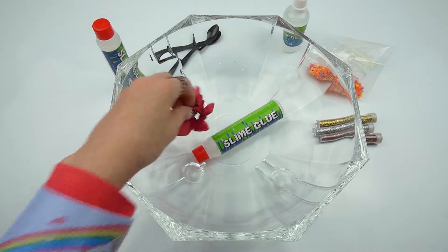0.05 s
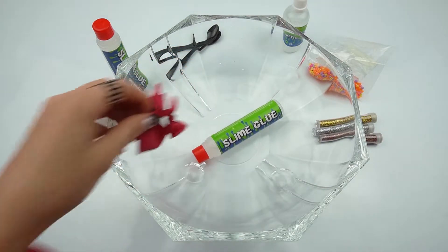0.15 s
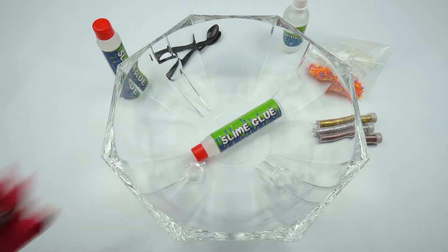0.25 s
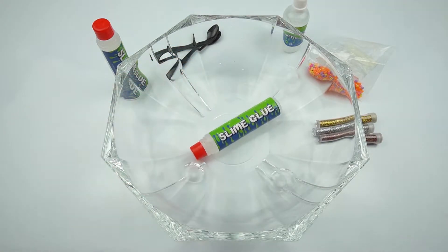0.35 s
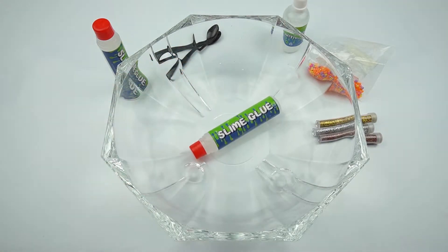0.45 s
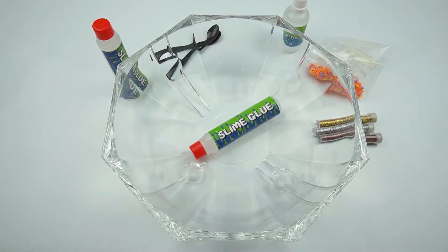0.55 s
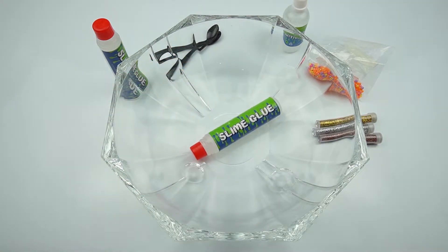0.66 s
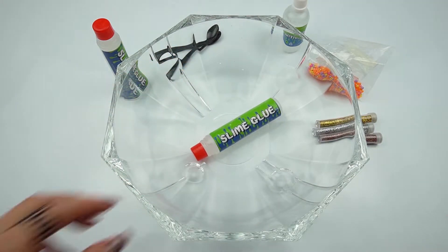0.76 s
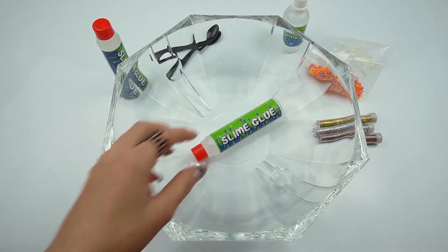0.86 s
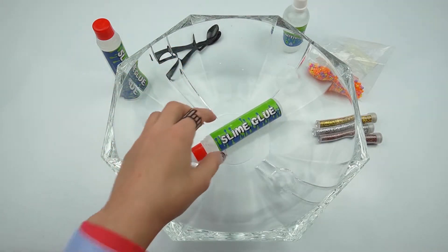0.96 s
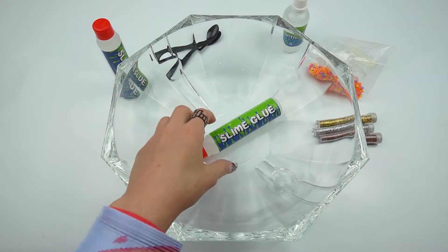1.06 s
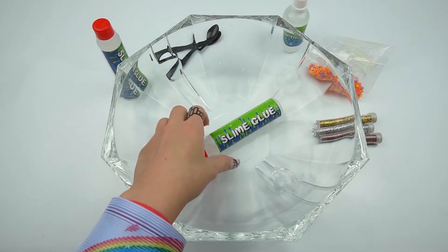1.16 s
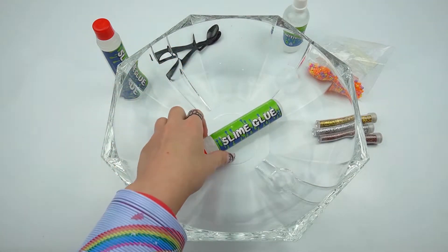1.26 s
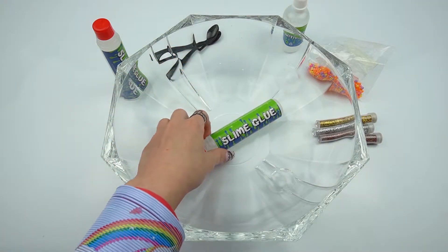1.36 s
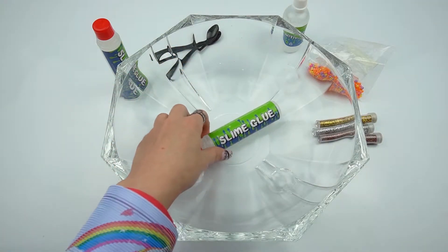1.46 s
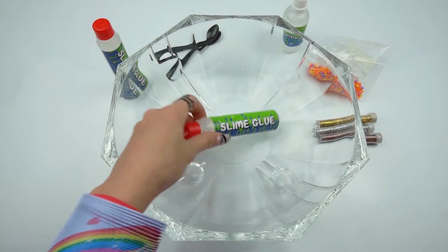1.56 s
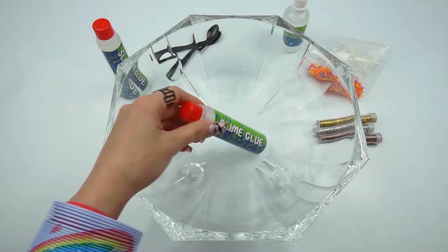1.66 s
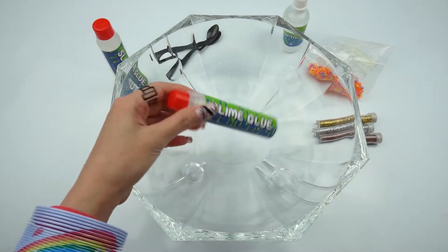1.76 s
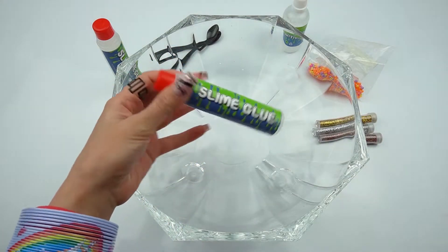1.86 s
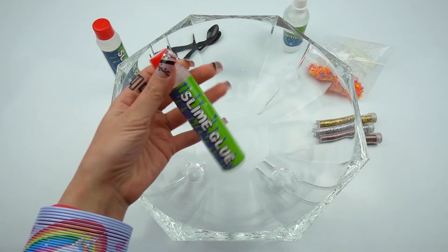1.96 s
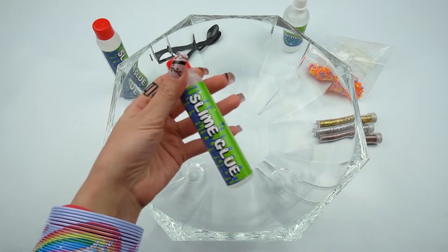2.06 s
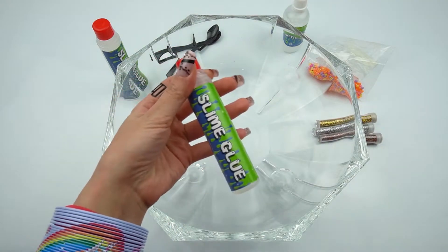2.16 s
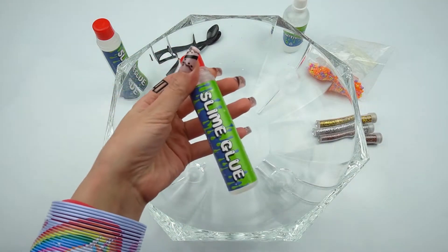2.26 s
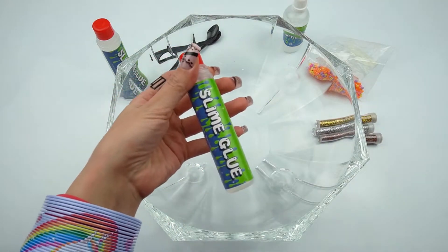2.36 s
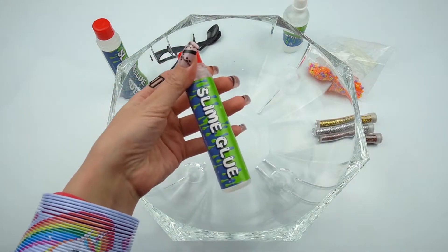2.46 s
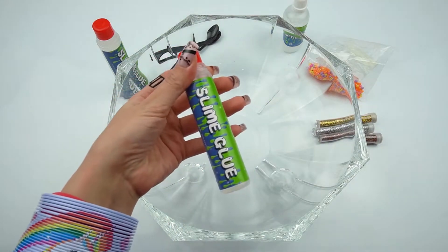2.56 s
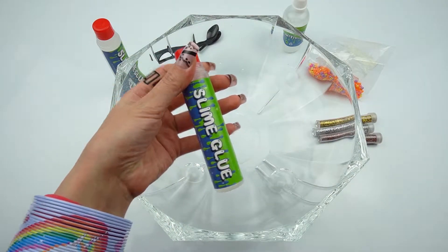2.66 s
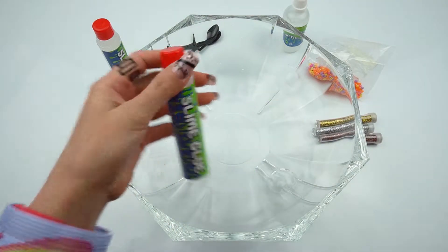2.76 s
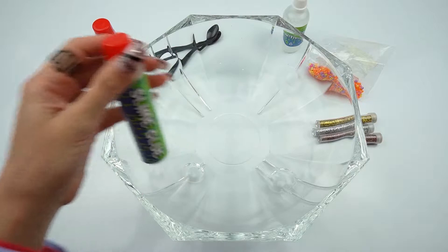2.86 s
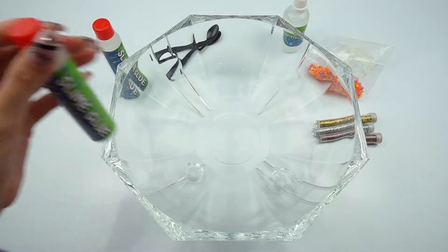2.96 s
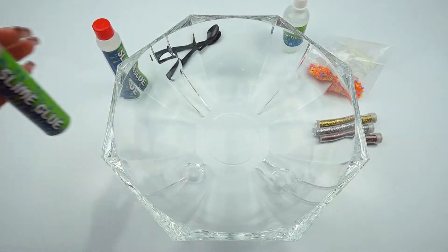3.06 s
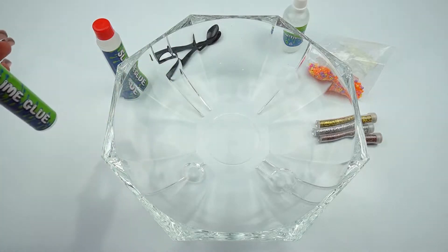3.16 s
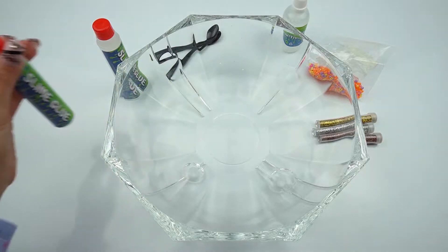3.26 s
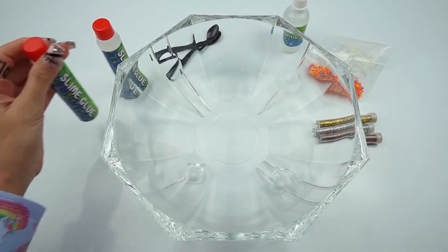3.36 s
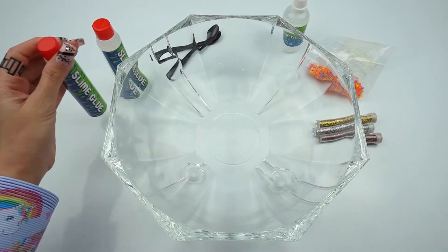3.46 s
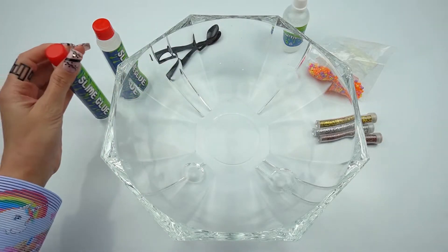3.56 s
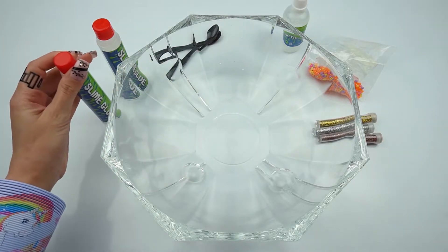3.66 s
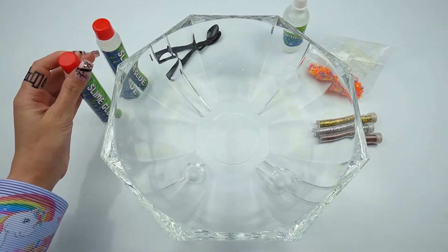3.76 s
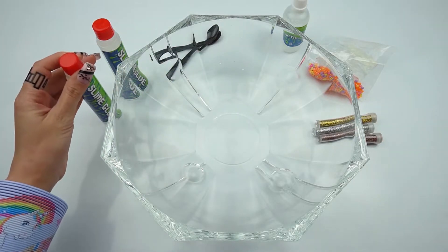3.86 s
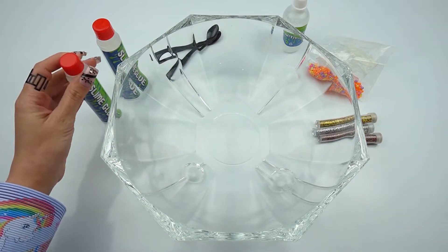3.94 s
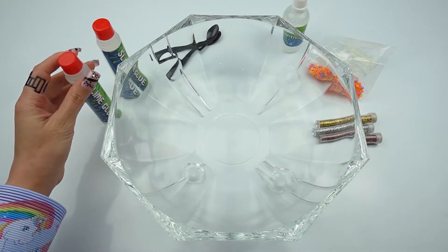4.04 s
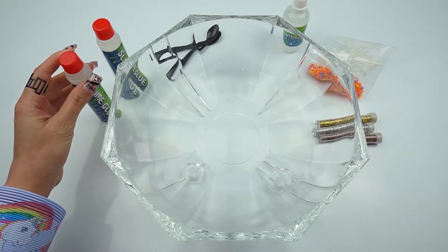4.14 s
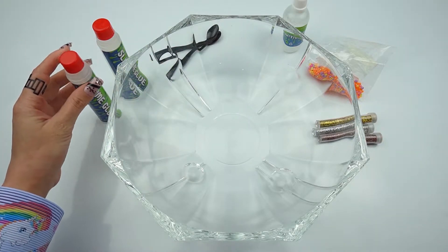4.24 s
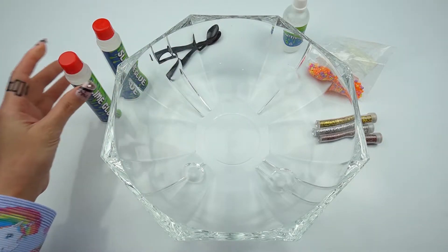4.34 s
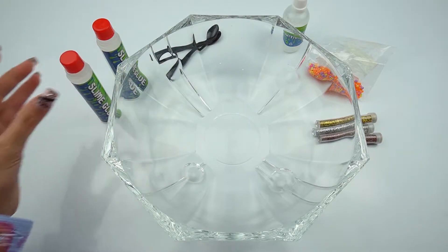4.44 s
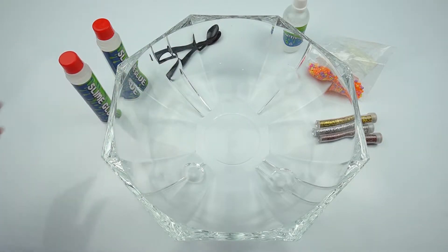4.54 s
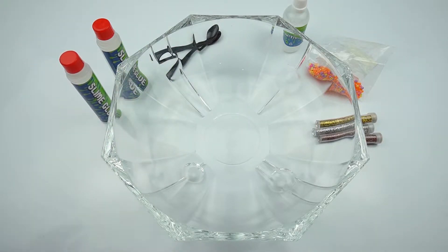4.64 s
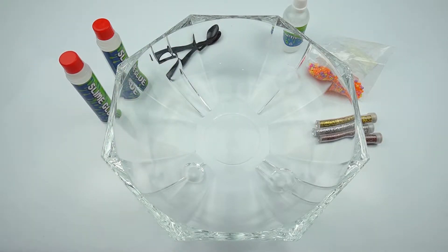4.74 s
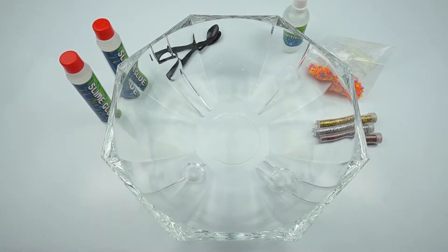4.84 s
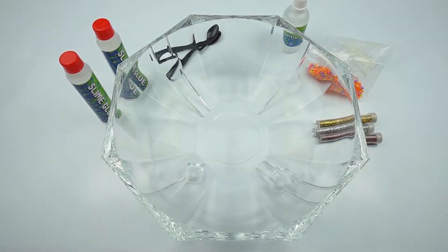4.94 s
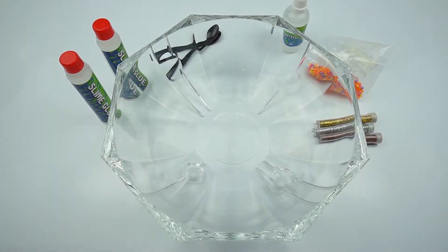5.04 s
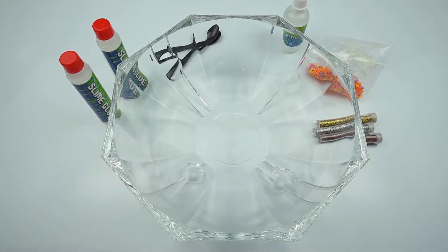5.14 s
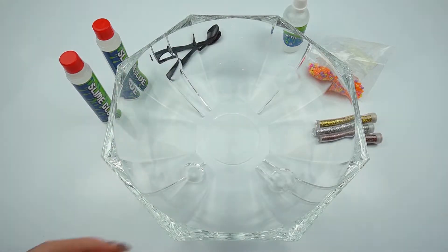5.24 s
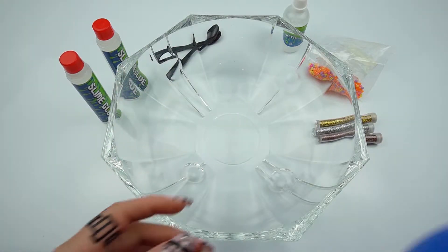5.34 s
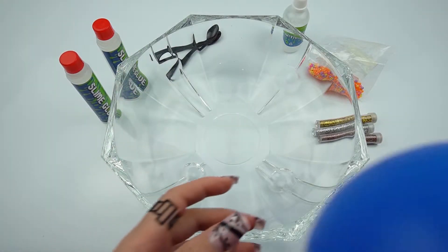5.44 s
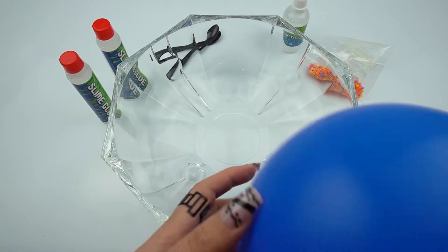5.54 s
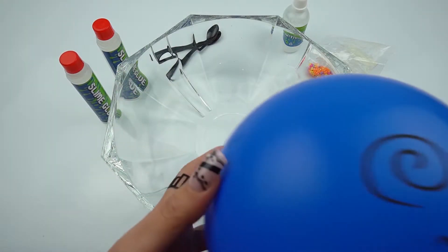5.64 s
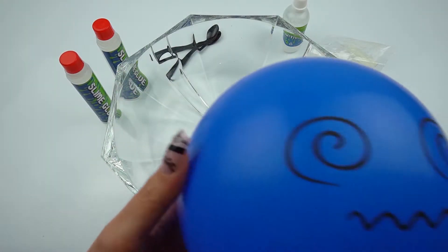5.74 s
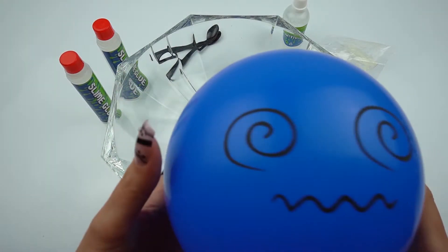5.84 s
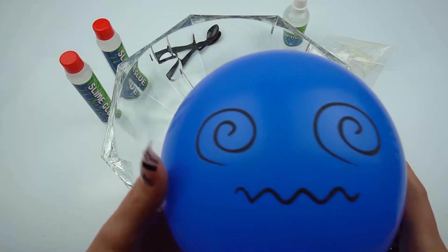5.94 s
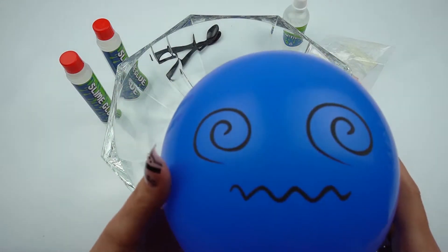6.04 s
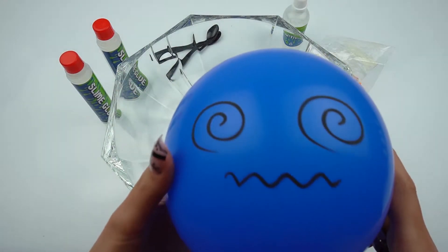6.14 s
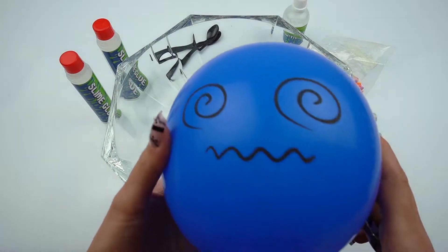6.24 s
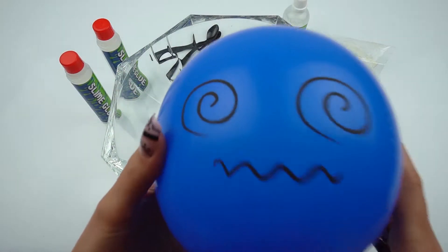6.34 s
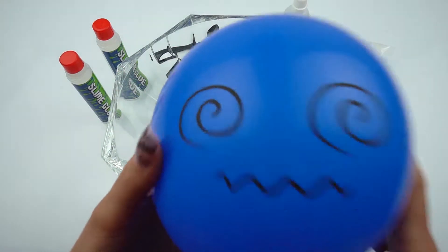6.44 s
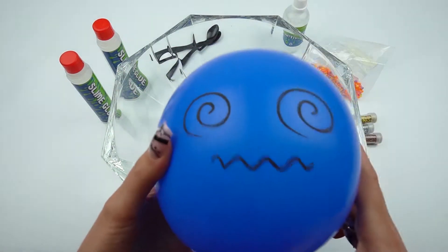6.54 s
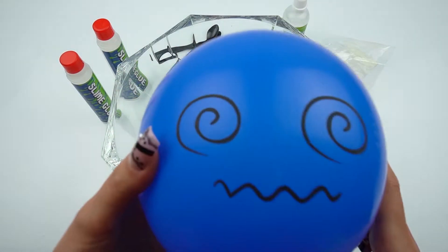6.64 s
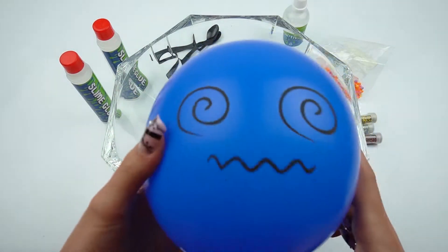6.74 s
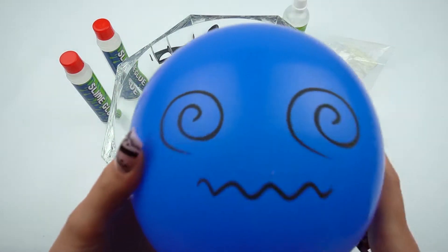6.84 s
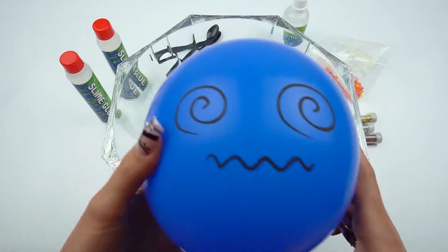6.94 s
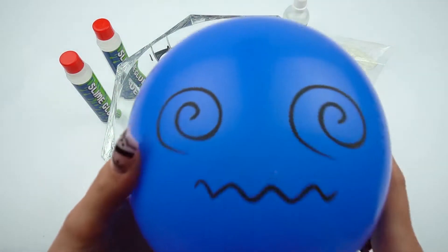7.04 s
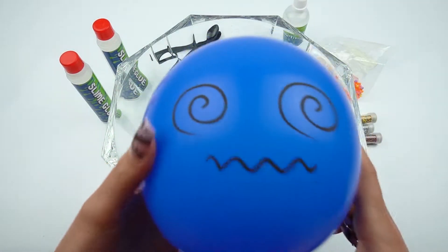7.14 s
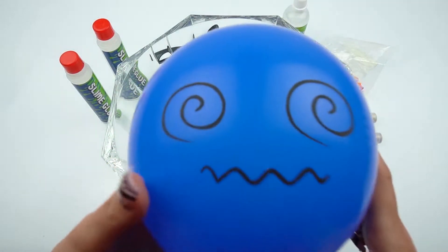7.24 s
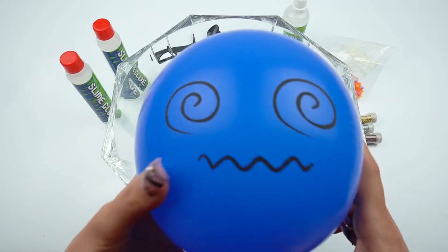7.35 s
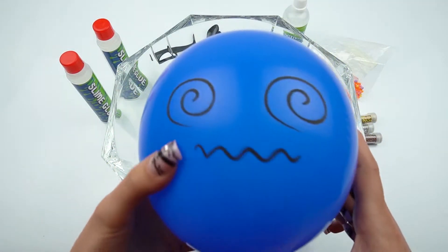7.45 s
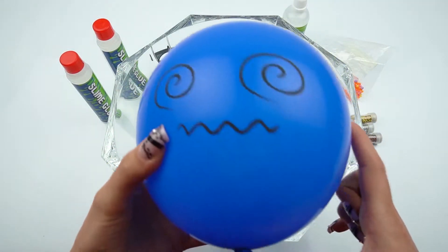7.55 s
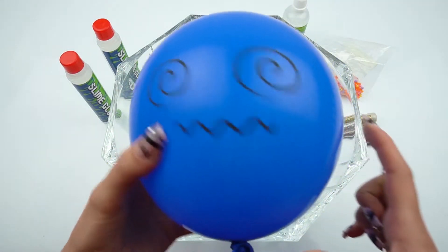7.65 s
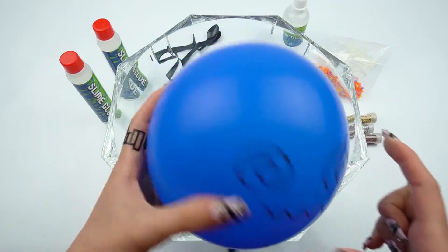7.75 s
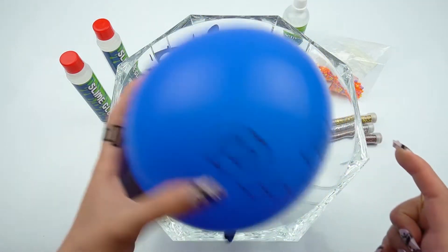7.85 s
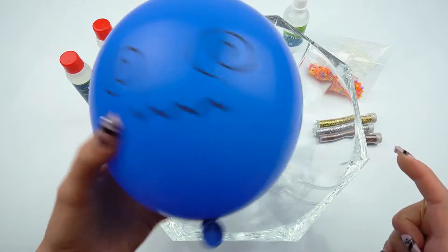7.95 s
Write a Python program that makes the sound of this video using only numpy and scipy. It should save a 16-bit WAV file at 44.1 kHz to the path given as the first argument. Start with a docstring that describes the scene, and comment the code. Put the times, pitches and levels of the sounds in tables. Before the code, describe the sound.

In a quiet small room, a hand shuffles softly, then nails and ring tick and clink brightly on a glass bowl as a plastic bottle is lifted. It lands on the table with a dull hollow knock. After a near-silent gap, an inflated balloon is handled right at the microphone: deep thumping pats, wobbling bass, hollow air ringing, sharp skin slaps and dry rubbery hiss, the loudest hits overloading.

```python
"""Bottle from a glass bowl, then a balloon

A hand lifts a plastic bottle out of a glass bowl, ring and nails clinking, and stands it on the table.
Two hands then turn and pat an inflated balloon right under the microphone. Filtered finger noise wobbles
the skin in the bass, rings the air inside and hisses over the rubber; decaying sines make pats and clinks.
The loudest pats overload the recorder."""
import sys
import numpy as np
from scipy import signal
from scipy.fft import rfft, irfft
from scipy.io import wavfile
from scipy.ndimage import uniform_filter1d

SR = 44100
rng = np.random.default_rng(int(sys.argv[2]) if len(sys.argv) > 2 else 0)


def wrap_up_sound(samples):
    """Save the sound to the file named by the first command line argument, as 16-bit audio."""
    columns = np.atleast_2d(samples).T
    # keep every value between -1 and 1, then stretch to whole-number steps
    tamed = np.clip(columns, -1, 1)
    steps = np.round(tamed * 32767).astype(np.int16)
    wavfile.write(sys.argv[1], SR, steps)


N = 352800

# Room tone spectrum: freq_hz, density_db
ROOM_TONE = [(20, -7.5), (61, 0.5), (142, -11), (277, -10), (759, -23.5), (1260, -27), (3440, -30),
             (13500, -37), (16000, -37)]
ROOM_DB, ROOM_T60_S, ECHO_DB = -51.5, 0.35, -17.5

# Movement felt through the table: time_s, rumble_db
HAND_RUMBLE = [(0, -35), (.23, -45.5), (.74, -57), (1.07, -55), (1.46, -40.5), (1.8, -43), (2.25, -48.5),
               (2.35, -37), (2.58, -45), (2.79, -62), (2.9, -33.5), (3.06, -51.5), (3.66, -58), (3.95, -43),
               (4.3, -81), (5.1, -53), (5.4, -44.5)]
# Short scuffs of skin, sleeve and plastic: start_s, end_s, change_by_end_db, dull_db, bright_db
SCUFFS = [(0, .14, -9, -68, -41), (.305, .325, 4, -81, -51.5), (.14, .44, -1.5, -52, -56.5),
          (.44, .78, -10.5, -56, -49.5), (.783, .803, -1, -41.5, -45), (.806, .93, -30, -45, -32),
          (1.004, 1.06, -19, -70, -47.5), (1.41, 1.52, -4.5, -47, -56), (2.27, 2.31, -13, -76, -53),
          (2.75, 2.95, -7, -59, -61), (3.72, 3.95, -11.5, -71, -55), (4.42, 4.56, 3.5, -82, -62),
          (4.66, 4.76, 2, -69, -59), (4.765, 4.83, -9, -41.5, -62), (4.886, 4.905, 3, -42, -63),
          (4.906, 4.995, -14, -30, -50), (5.0, 5.087, -2.5, -34, -57)]
# Fingers slide along the smooth bottle: start_s, end_s, change_by_end_db, level_db
BOTTLE_SLIDES = [(1.622, 1.725, -11, -48), (1.826, 1.868, 3, -42.5), (1.87, 2.025, 7, -59)]
# Spectrum of the table rumble: freq_hz, density_db
RUMBLE_SPECTRUM = [(20, 14.5), (32, 6), (80, 5), (113, -13), (140, 0), (180, -21), (310, -66)]
# Spectrum of dull handling and of the table's wash: freq_hz, density_db
KNOCK_SPECTRUM = [(65, -7), (120, -0.5), (300, 3.5), (560, -12.5), (1050, -13.5), (2000, -22),
                  (3600, -23.5), (7000, -44)]
# Spectrum of the sleeve and skin rustle: freq_hz, density_db
RUSTLE_SPECTRUM = [(710, -6.5), (1200, -5), (2350, -6.5), (3220, 1.5), (3700, -1), (10100, -16),
                   (14800, -24), (16000, -67)]
# Spectrum of fine sliding hiss: freq_hz, density_db
FINE_HISS_SPECTRUM = [(1500, -3), (3000, 1), (6000, -1), (12000, -3), (16000, -7)]

# Bottle or hand meets the table: time_s, level_db
SET_DOWNS = [(1.295, -35.5), (1.436, -31.5), (2.882, -42), (3.708, -11)]
# Table top modes: freq_hz, level_db, t60_s
TABLE_MODES = [(31.93, -18.5, 1.87), (72, -15.5, 0.6), (104, -9.5, 0.47), (155, -5, 0.19), (185, -5, 0.36),
               (241, -16, 0.16), (281, -9.5, 0.17), (350, -14, 0.14), (386, -15, 0.11), (557, -13.5, 0.056)]
# Hollow plastic bottle modes: freq_hz, level_db, t60_s
BOTTLE_MODES = [(453, -12, 0.034), (632, -10.5, 0.056), (1045, -32, 0.12), (1666, -13, 0.028),
                (1856, -10.5, 0.024)]
TABLE_LAG_S = 0.01204  # the table top answers late
ROCK_S, ROCK_DB = 0.05, -16.5  # the bottle rocks and lands once more

# Blows on the glass: time_s, level_db, place (0 wall, 1 foot), softness_db_per_octave
CLINKS = [(1.12, -23.5, 0.022, 1.5), (1.272, -40.5, 0.56, 8.5), (1.293, -33.5, 0.78, 7.5),
          (1.381, -56.5, 0.83, 14.5), (1.43, -52.5, 1, 2.5), (1.503, -49, 0.06, 7),
          (1.702, -51.5, 0.18, 6.5)]
# Glass bowl mode pitches: freq_hz
GLASS_HZ = [690, 1642, 2430, 3521, 4592, 5281, 5814, 6002, 6180, 7187, 7822, 8963, 9243, 10210, 11225,
            11820, 12020, 12200, 12470, 14620]
# Glass bowl mode strengths, in the same order: wall_db, foot_db, t60_s
GLASS_MODES = [(-25.5, -38.5, 0.18), (-16.5, -55, 0.51), (-29, -46, 0.72), (-20, 9.5, 0.09),
               (-7.5, -9, 0.18), (-28, -27, 0.35), (-6, -13, 0.2), (-4, -12, 0.26), (-16, -26, 0.24),
               (-19, -24, 0.29), (-16.5, -13, 0.32), (-27, -9.5, 0.61), (-12, -5, 0.15), (-23, -15, 0.42),
               (-19, -28, 0.2), (-24, -10, 0.26), (-11, -38, 0.069), (-18, -40, 0.35), (-21, -40, 0.19),
               (-20, -45, .16)]
WAVER_MAX_HZ, WAVER_DEPTH = 39, 0.42  # each mode wavers at a random rate, redrawn for every blow

# Nails, ring and plastic tick: time_s, level_db, centre_hz
TICKS = [(0.1, -24, 4340), (0.264, -33, 5330), (0.376, -26, 3950), (0.805, -18, 2230), (1.12, -19, 5660),
         (1.144, -16, 2550), (1.147, -17.5, 1870), (1.148, -23, 760), (1.207, -21.5, 1900),
         (1.263, -25, 9300), (1.271, -21.5, 6000), (1.292, -32, 2560), (1.315, -30, 790),
         (1.382, -30, 7240), (1.429, -28, 1530), (1.828, -34, 6100), (1.839, -22, 8140),
         (1.857, -18.5, 3170), (3.708, -17, 4580), (4.54, -35, 3030), (4.708, -34.5, 3100),
         (5.05, -30, 2870)]
TICK_T60_S, TICK_RISE_S = 0.035, 0.0006
# Short narrow squeaks, one among the hand scuffs, the rest on the rubber: time_s, level_db, pitch_hz
SQUEAKS = [(4.907, -35, 3680), (5.505, -44, 1570), (5.521, -46, 3450), (5.542, -43, 2820),
           (5.568, -48, 2800)]
SQUEAK_T60_S = 0.032

# Skin slaps on the rubber: time_s, level_db, brightness_db_per_octave, snap_hz
SLAPS = [(5.597, -20.5, -8.5, 1950), (6.019, -27, -7, 800), (6.226, -23.5, 0, 794), (6.307, -26.5, 2, 700),
         (6.599, -5.5, -3, 3260), (6.611, -15, 1, 3720), (6.71, -24.5, 2, 4370), (6.795, -23, 0.5, 3330),
         (6.801, -11.5, -1.5, 3460), (6.919, -23, -2.5, 895), (7.003, -19, 3, 2000), (7.015, -18, 1, 3320),
         (7.024, -28, 2, 3000), (7.199, -14, 1, 2510), (7.213, -14, 0.5, 7000), (7.223, -36, 14, 3000),
         (7.233, -42, 8, 6040), (7.36, -21.5, 2.5, 890), (7.421, -25, 2.5, 8700), (7.426, -20.5, 2.5, 810),
         (7.488, -25, -10, 500), (7.506, -24, -13, 550), (7.536, -13, -8, 2850), (7.558, -26, -9, 500),
         (7.85, -17, -6.5, 1230)]
# Slap spectrum before the brightness tilt: freq_hz, density_db
SLAP_SPECTRUM = [(290, -46), (500, 3), (2540, -18), (3540, -17), (4340, -19.5), (8450, -31), (12300, -34.5),
                 (16000, -62)]
SNAP_DB, SNAP_WIDTH = -4.5, 0.5  # the spot hit snaps at its own pitch; width as a share of the pitch

# Fingers slide over the rubber: start_s, end_s, change_by_end_db, wobble_db, drag_db, hiss_db
STROKES = [(5.3, 5.44, -4, -41, -61, -65), (5.44, 5.6, 0, -28, -51, -60),
           (5.6, 5.735, -7.5, -12.5, -36, -47.5), (5.73, 5.79, -3.5, -10.5, -35.5, -46.5),
           (5.79, 5.92, -9, -16, -34, -39), (5.9, 5.995, -10, -16.5, -40.5, -44),
           (6.015, 6.22, -15.5, -16.5, -35, -47), (6.227, 6.385, -16, -10.5, -29, -44),
           (6.37, 6.51, 3.5, -17, -40, -59), (6.51, 6.6, 5.5, -26.5, -49, -62.5),
           (6.65, 6.71, -13.5, -3, -31.5, -79), (6.72, 6.785, -13.5, -14.5, -41, -44),
           (6.805, 6.9, -30, -3.5, -29, -61), (6.908, 7.0, -17.5, -14.5, -31.5, -43.5),
           (7.03, 7.1, 1, -16.5, -39, -65), (7.09, 7.125, -3, -14.5, -52, -45.5),
           (7.135, 7.195, -6.5, -23, -41, -44.5), (7.2, 7.26, -9, -6.5, -32, -65),
           (7.26, 7.365, 0, -10.5, -37, -48.5), (7.385, 7.47, 1, -12.5, -38.5, -54),
           (7.47, 7.55, -1.5, -9.5, -40, -47), (7.55, 7.645, -8, -8.5, -40, -49.5),
           (7.715, 7.82, -19, -21.5, -40, -49), (7.82, 7.85, -9, -30, -36.5, -45),
           (7.845, 7.985, -10, -10, -36, -50.5), ]
# The grip tightens and slackens the skin: time_s, wobble_hz
SQUEEZE = [(5.4, 42), (5.63, 50.7), (5.8, 76.5), (5.93, 55.3), (6.06, 86.4), (6.13, 113), (6.23, 87),
           (6.33, 93), (6.44, 141), (6.6, 94), (7.05, 99.4), (7.4, 87.4), (7.49, 127.6), (7.6, 91.3),
           (7.65, 49), (7.82, 62.5), (7.87, 107.4), (7.94, 63.5)]
# Fingers pat the skin: time_s, level_db, wobble_hz
PATS = [(5.597, -2.5, 51.8), (5.731, -10.5, 54), (5.9, -13, 49.6), (6.021, -9, 81.6), (6.227, -10, 80.4),
        (6.599, 1.5, 92.5), (6.61, -16.5, 96.5), (6.798, -1.5, 93.9), (7.005, 0, 93), (7.197, -3, 95.4),
        (7.212, 0.5, 100), (7.361, -1.5, 96.7), (7.544, -4, 50.5), (7.652, -11.5, 45.3), (7.717, -25, 186),
        (7.806, -15, 158), (7.845, -6.5, 47.8)]
# Modes of the air inside: freq_hz, width_hz, level_db
AIR_MODES = [(159.4, 10.6, 5), (258, 20.7, -4), (306, 30, -15), (477.5, 30, -18.5)]
# Stretched patch under the finger: time_s, pitch_hz, level_db (against the drag)
PATCH = [(5.95, 790, -22), (6.03, 797, -3), (6.15, 550, -12), (6.32, 607, 4.5), (6.42, 598, -4),
         (6.5, 895, -14), (7.22, 835, -17), (7.42, 850, -4), (7.6, 476, -19), (7.84, 900, -7)]
# Spectrum of the finger drag: freq_hz, density_db
DRAG_SPECTRUM = [(180, -3.5), (300, 0), (480, -22), (746, -8.5), (1240, -17), (1750, -20.5), (3670, -21.5),
                 (4230, -37), (9000, -52), (19800, -120)]
# Spectrum of the finger hiss: freq_hz, density_db
HISS_SPECTRUM = [(1500, -8.5), (2800, 2), (3600, 5.5), (5500, -0.5), (9000, -5.5), (12500, -12),
                 (16000, -21)]
# Treble in the finger hiss: time_s, level_db (against the hiss)
FINE_SHARE = [(6.6, -19), (6.92, 0.5), (7.17, 1.5), (7.5, -13)]
SKIN_SMOOTH_S = 0.042  # skin and air follow the finger slowly
UPPER_RATIO, UPPER_DB = 1.754, -13.5  # second skin mode, against the first
LOPSIDED = 0.09  # the skin swings out further than in
STUTTER = 0.057  # each swing makes the finger catch and slip
AIR_DB = 16.5  # against the drag
REST_HZ, TAUT_POWER = 91.5, 0.84  # usual wobble; tighter skin rings the air more
PAT_SWINGS, PAT_AIR_DB = 16, -9.5  # swings to -60 dB; a pat also rings the air
CRACKLES_PER_S, CRACKLE_SPREAD_DB = 340, 2  # the rubber sticks and lets go in tiny snaps
CRACKLE_DB, CREAK_DB = -4.5, -4  # crackle against the hiss; ringing snaps against the drag

OVERLOAD, KNEE, EDGE_HZ = 0.684, 20, 15900


def gain_of(db):
    """Decibels to an amplitude factor."""
    return 10 ** (np.asarray(db) / 20)


def evened(x):
    """Scales to rms 1."""
    return x / np.sqrt(np.mean(x ** 2) + 1e-20)


def columns(rows):
    """Interpolates each value column linearly over time."""
    time_s, *values = np.transpose(rows)
    return [np.interp(np.arange(N) / SR, time_s, v) for v in values]


def add(mix, start_s, sound):
    """Mixes a sound in, cut at the end of the mix."""
    part = mix[round(start_s * SR):][:len(sound)]
    part += sound[:len(part)]


def bursts(rows, rise_s, fall_s):
    """One envelope per dB column: linear rise, dB slope, then a fall of 60 dB per fall_s past the end."""
    levels = np.zeros((len(rows[0]) - 3, N))
    t = np.arange(SR // 2) / SR
    for start_s, end_s, change_db, *dbs in rows:
        length_s = max(end_s - start_s, .005)
        slope_db = change_db * t / length_s
        fall_db = 60 * np.maximum(t - length_s, 0) / fall_s
        shape = gain_of(slope_db - fall_db) * np.minimum(t / rise_s, 1)
        for level, db in zip(levels, dbs):
            add(level, start_s, gain_of(db) * shape)
    return levels


def grainy(spread_db, per_s):
    """Noise whose level wanders about per_s times a second, as slipping skin does."""
    steps = np.minimum(rng.exponential(1, 4000), 4)
    wander = np.interp(np.arange(N) * per_s / SR, np.arange(len(steps)), steps)
    return rng.standard_normal(N) * gain_of(spread_db * wander)


def crackle():
    """Sparse snaps of random sign and uneven size, a few of them large."""
    size = gain_of(CRACKLE_SPREAD_DB * np.minimum(rng.exponential(1, N), 4))
    return size * rng.choice([-1., 1.], N) * (rng.random(N) < CRACKLES_PER_S / SR)


def coloured(x, spectrum):
    """Filters x by a (freq_hz, density_db) curve, linear in log frequency; rms 1."""
    f, db = np.transpose(spectrum)
    hz = np.fft.rfftfreq(len(x), 1 / SR)
    curve_db = np.interp(np.log(hz + 1), np.log(f + 1), db)
    return evened(irfft(rfft(x) * gain_of(curve_db), len(x)))


def patchy(x, spread_db):
    """Lifts and dips random patches of pitch and time: the touched spot and its colour keep changing."""
    z = signal.stft(x, nperseg=1024)[2]
    hills = rng.standard_normal((z.shape[1], 60))
    hills = uniform_filter1d(hills, size=2, axis=0)
    # 60 bands, about logarithmic in frequency
    place = np.log2(1 + np.arange(len(z)) / 4) / np.log2(1 + len(z) / 4) * 59
    hills = np.array([np.interp(place, np.arange(60), h) for h in hills]).T
    shaped = z * gain_of(spread_db * evened(hills))
    return evened(signal.istft(shaped, nperseg=1024)[1][:len(x)])


def resonate(x, hz, width_hz):
    """Resonance of gain 1 at a fixed or moving pitch: shift down to zero, smooth, shift back."""
    turn = np.exp(2j * np.pi * np.cumsum(hz * np.ones(len(x))) / SR)
    r = np.exp(-np.pi * width_hz / SR)
    return 2 * (turn * signal.lfilter([1 - r], [1, -r], x / turn)).real


def resonate_twice(x, hz, width_hz, second_width_hz):
    """Two resonances in series at one pitch, for steeper sides."""
    return resonate(resonate(x, hz, width_hz), hz, second_width_hz)


def ring(hz, db, t60_s, rise_s, phase=0):
    """One mode: a sine with linear rise and exponential decay."""
    t = np.arange(SR) / SR
    return gain_of(db - 60 * t / t60_s) * np.sin(2 * np.pi * hz * t + phase) * np.minimum(t / rise_s, 1)


def room_tone():
    """Steady coloured noise."""
    return gain_of(ROOM_DB) * coloured(rng.standard_normal(N), ROOM_TONE)


def room_echo(x):
    """Sparse decaying echoes of random sign, treble softened."""
    taps = np.zeros(SR // 2)
    at = np.arange(400, SR // 2 - 20, 20)
    taps[at + rng.integers(0, 20, len(at))] = rng.choice([-1., 1.], len(at))
    tail = taps * gain_of(-60 * np.arange(len(taps)) / SR / ROOM_T60_S)
    tail = signal.lfilter([.4], [1, -.6], tail)
    return signal.fftconvolve(x, tail / np.linalg.norm(tail))[:N]


def hands():
    """Rumble through the table, dull handling, bottle slides and a patchy rustle of sleeve and skin."""
    rumble_db, = columns(HAND_RUMBLE)
    dull, bright = bursts(SCUFFS, 0.0023, 0.023)
    slide, = bursts(BOTTLE_SLIDES, 0.0017, 0.011)
    rumble = (gain_of(rumble_db) + dull) * coloured(rng.standard_normal(N), RUMBLE_SPECTRUM)
    sliding = slide * coloured(grainy(2.4, 150), FINE_HISS_SPECTRUM)
    knocking = dull * patchy(coloured(grainy(0.95, 90), KNOCK_SPECTRUM), 4.5)
    rustle = bright * patchy(coloured(grainy(0.99, 190) + 0.69 * crackle(), RUSTLE_SPECTRUM), 3.8)
    return rumble + sliding + knocking + rustle


def table():
    """A down-and-up push and a short hollow bottle note, then the table top builds up its ring."""
    out, blow = np.zeros(N), np.zeros(SR)
    t = np.arange(SR) / SR
    add(blow, TABLE_LAG_S, sum(ring(hz, db, t60_s, 0.0082) for hz, db, t60_s in TABLE_MODES))
    push = np.sin(np.linspace(0, 2 * np.pi, 300))
    add(blow, 0, -1.5 * push * abs(push) ** 0.56)
    # many faint modes blur into a dull wash
    wash = gain_of(-13.5 - 60 * t / 0.092) * np.minimum(t / 0.0032, 1)
    blow += wash * coloured(rng.standard_normal(SR), KNOCK_SPECTRUM)
    bottle = sum(ring(hz, db, t60_s, 0.0042) for hz, db, t60_s in BOTTLE_MODES)
    for time_s, db in SET_DOWNS:
        add(out, time_s, gain_of(db) * (blow + bottle))
        add(out, time_s + ROCK_S, gain_of(db + ROCK_DB) * bottle)
    return out


def glass():
    """Wavering modes; the place of the blow blends their strengths, a soft blow favours the low ones."""
    out, t = np.zeros(N), np.arange(SR) / SR
    all_draws = rng.random((len(CLINKS), len(GLASS_MODES), 2))
    for (time_s, db, place, soft_db), draws in zip(CLINKS, all_draws):
        for hz, (wall_db, foot_db, t60_s), (rate, phase) in zip(GLASS_HZ, GLASS_MODES, draws):
            mode_db = wall_db + np.clip(place, 0, 1) * (foot_db - wall_db)
            level_db = db + mode_db - soft_db * np.log2(hz / 6000)
            waver = 1 + WAVER_DEPTH * np.cos(2 * np.pi * (WAVER_MAX_HZ * rate * t + phase))
            add(out, time_s, ring(hz, level_db, t60_s, 0.00088) * waver)
    return out


def ticks():
    """Ticks are a few swings inside a short noise burst; squeaks are single decaying sines."""
    out, t = np.zeros(N), np.arange(8000) / SR
    for (time_s, db, hz), noise in zip(TICKS, rng.standard_normal((len(TICKS), len(t)))):
        body = evened(resonate_twice(noise, hz, 0.64 * hz, 1.5 * hz))
        front = 1.12 * np.exp(-t / 0.0012) * (np.sin(2 * np.pi * hz * t) + 0.7 * body)
        tail = 0.61 * gain_of(-60 * t / TICK_T60_S) * body
        add(out, time_s, gain_of(db - 12.0) * np.minimum(t / TICK_RISE_S, 1) * (front + tail))
    for time_s, db, hz in SQUEAKS:
        add(out, time_s, ring(hz, db, SQUEAK_T60_S, 0.0018))
    return out


def slaps():
    """Noise with a sharp edge and a rattle of about 6 ms, plus a snap at the pitch of the spot hit."""
    out, t = np.zeros(N), np.arange(4096) / SR
    f, db = np.transpose(SLAP_SPECTRUM)
    shape = np.minimum(t / 0.00045, 1) * (0.2 + np.exp(-t / 0.00046)) / (1 + (t / 0.0062) ** 6)
    for (time_s, level_db, tilt_db, hz), noise in zip(SLAPS, rng.standard_normal((len(SLAPS), len(t)))):
        noise = coloured(noise, np.transpose([f, db + tilt_db * np.log2(f / 2000)]))
        snap = resonate_twice(noise, hz, SNAP_WIDTH * hz, 2 * SNAP_WIDTH * hz)
        add(out, time_s, gain_of(level_db) * shape * (noise + gain_of(SNAP_DB) * snap / SNAP_WIDTH))
    return out


def skin_swing(slips, skin_hz):
    """Finger slips drive the first skin mode; the fingers keep it going at a nearly steady swing."""
    skin = resonate_twice(slips, skin_hz, 35.3, 34.0)
    skin /= np.sqrt(uniform_filter1d(skin ** 2, size=1500) + 0.07 * np.mean(skin ** 2))
    skin = evened(skin)
    return skin + LOPSIDED * (skin ** 2 - uniform_filter1d(skin ** 2, size=1500))


def stretched_patch():
    """The stretched patch under the finger sings at a pitch that moves with the finger."""
    patch_hz, patch_db = columns(PATCH)
    drift = evened(uniform_filter1d(rng.standard_normal(N), size=1200))
    patch_hz = patch_hz * 2 ** (0.069 * drift)
    return gain_of(patch_db) * evened(resonate_twice(grainy(2.4, 150), patch_hz, 77, 180))


def creaks():
    """Snaps ring two random spots of the skin, redrawn every 700 samples."""
    spot_hz = 250 * 2 ** (2.1 * rng.random((N // 700 + 1, 2)))
    spot_hz = np.repeat(spot_hz, 700, axis=0)[:N]
    return coloured(sum(resonate(crackle(), hz, 32) for hz in spot_hz.T), DRAG_SPECTRUM)


def pats():
    """The skin jumps inward at once, then swings; the air inside rings along."""
    out = np.zeros(N)
    hollow = sum(ring(hz, PAT_AIR_DB + db, 0.63 / width_hz, 0.015) for hz, width_hz, db in AIR_MODES)
    for time_s, db, hz in PATS:
        add(out, time_s, gain_of(db) * hollow - ring(hz, db, PAT_SWINGS / hz, 0.00178, 0.2))
    return out


def balloon():
    """Finger slips shake the skin, whose pitch follows the squeeze, and the air inside it."""
    skin_hz, = columns(SQUEEZE)
    fine_db, = columns(FINE_SHARE)
    wobble, drag, hiss = bursts(STROKES, 0.02, 0.039)
    wobble, air_level = uniform_filter1d([wobble, drag], round(SKIN_SMOOTH_S * SR))
    slips = grainy(3.95, 60)
    skin = skin_swing(slips, skin_hz)
    upper = resonate_twice(grainy(2.3, 60), UPPER_RATIO * skin_hz, 25, 50)
    # the whole balloon sways the air
    sway = coloured(slips, [(15, 4), (40, 46.0), (65, 39.5), (130, -48.0)])
    out = wobble * (evened(skin) + gain_of(UPPER_DB) * evened(upper) + 0.35 * sway)
    air = sum(gain_of(db) * resonate_twice(slips, hz, w, 3 * w) for hz, w, db in AIR_MODES)
    out += gain_of(AIR_DB) * air_level * (skin_hz / REST_HZ) ** TAUT_POWER * evened(air)
    stutter = 1 + STUTTER * skin
    rubbing = patchy(coloured(grainy(2.2, 60), DRAG_SPECTRUM), 2.66)
    out += drag * stutter * (rubbing + stretched_patch())
    out += hiss * stutter * patchy(coloured(grainy(1.6, 90), HISS_SPECTRUM), 3)
    out += gain_of(fine_db) * hiss * patchy(coloured(grainy(4.3, 120), FINE_HISS_SPECTRUM), 2.7)
    out += gain_of(CRACKLE_DB) * hiss * coloured(crackle(), HISS_SPECTRUM)
    out += gain_of(CREAK_DB) * drag * creaks()
    return out + pats()


def scene():
    """All sources over the room tone, with room echo on the sharp sounds."""
    tick = ticks()
    sharp = 0.54 * tick + glass() + table() + slaps()  # ticks feed the echo at reduced level
    echo = gain_of(ECHO_DB) * room_echo(sharp)
    return (room_tone() + hands() + 0.65 * tick + sharp + echo + balloon())[None]


def record(dry):
    """The loudest bass swings flatten against a tight knee; then the band limit."""
    clipped = dry / (1 + abs(dry / OVERLOAD) ** KNEE) ** (1 / KNEE)
    lowpass = signal.firwin(511, EDGE_HZ, window=("kaiser", 9), fs=SR)
    return signal.oaconvolve(clipped, lowpass[None], "same")


dry = scene()
out = record(dry)
wrap_up_sound(out)
```